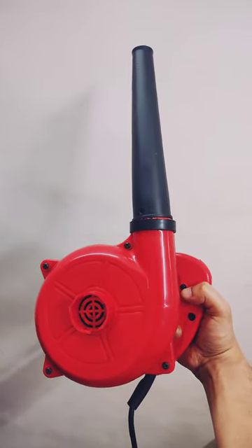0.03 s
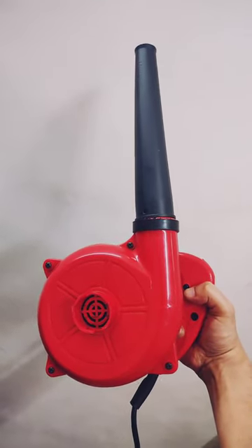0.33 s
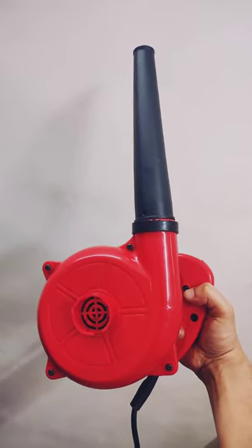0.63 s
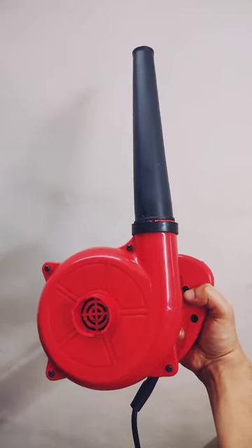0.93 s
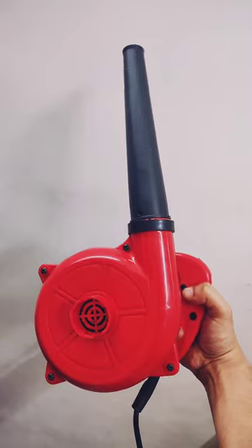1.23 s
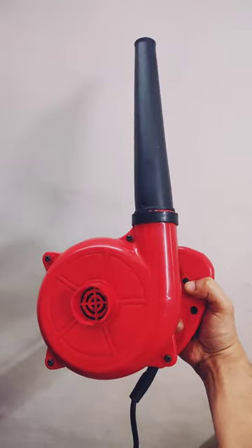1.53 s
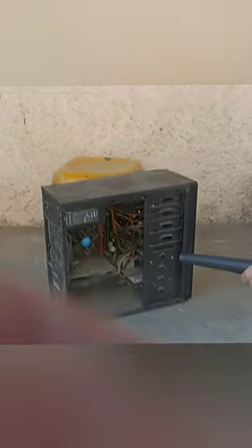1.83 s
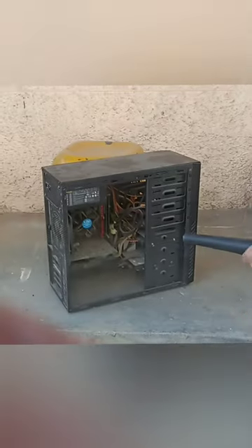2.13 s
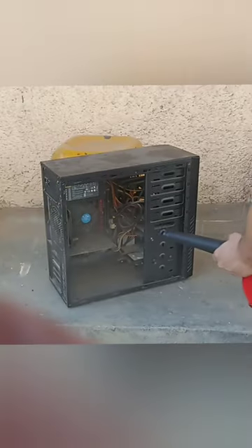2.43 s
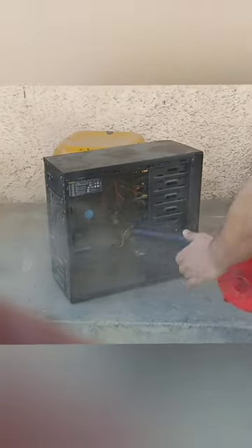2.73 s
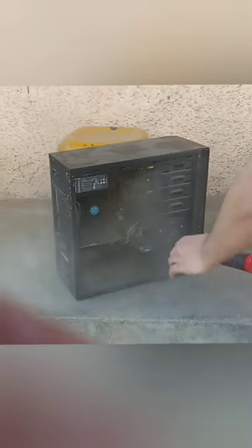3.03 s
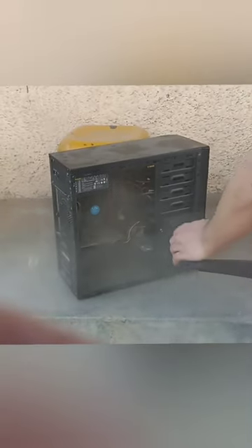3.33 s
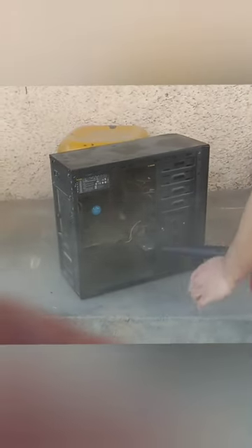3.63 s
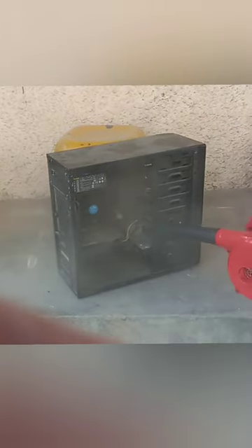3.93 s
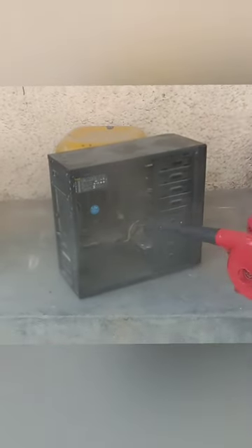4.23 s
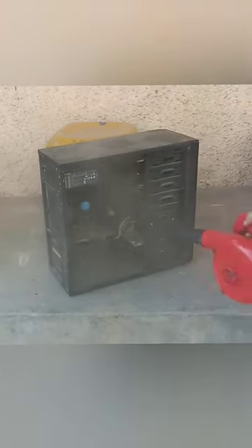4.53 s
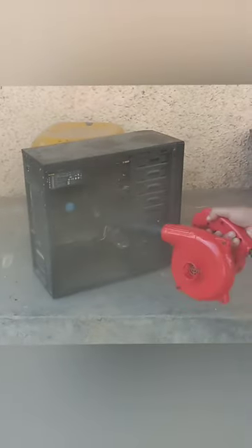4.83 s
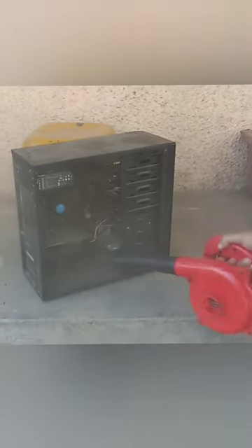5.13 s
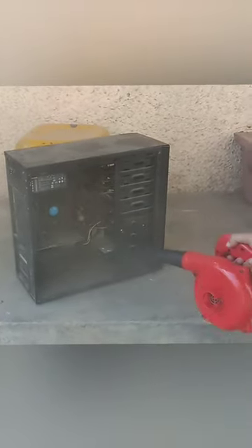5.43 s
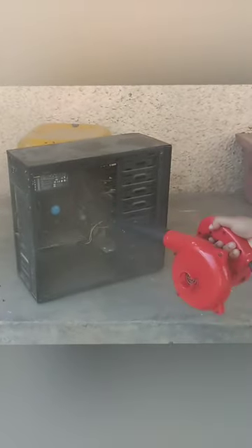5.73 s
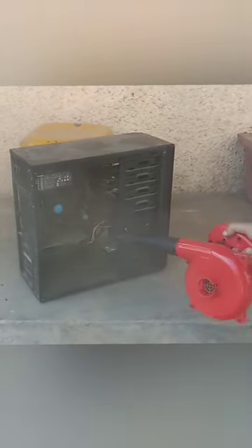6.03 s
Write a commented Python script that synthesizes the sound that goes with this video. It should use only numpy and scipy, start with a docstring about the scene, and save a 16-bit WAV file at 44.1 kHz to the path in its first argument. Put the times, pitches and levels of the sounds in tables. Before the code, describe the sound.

A hand-held electric blower whines and rushes at full speed close to the microphone, then is released and falls in pitch. After a split second of silence it is in a yard, off to the right. It spins up, coasts down and spins up again, its jet hissing and booming in a metal computer case. A finger on the microphone makes two short thumps.

```python
"""The whine and rush of a hand-held electric blower at full speed, close to the microphone; let go, it runs
down. After a brief silence it is out in a yard, off to the right, switched on twice more to blow the dust
out of a computer case. Impeller and commutator whine with the rotor's speed, the jet rushes and booms in
the case; a finger lies over the microphone and thumps as it shifts and lifts."""
import sys
import numpy as np
from scipy import signal
from scipy.fft import rfft, irfft, next_fast_len
from scipy.io import wavfile
from scipy.ndimage import uniform_filter1d

SR = 44100
rng = np.random.default_rng(int(sys.argv[2]) if len(sys.argv) > 2 else 0)


def unload_wav(signal):
    """Save mono or channel-first audio to the path in sys.argv[1] as 16-bit WAV at rate SR, clipped to [-1, 1]."""
    wavfile.write(
        sys.argv[1],
        SR,
        np.round(np.clip(np.atleast_2d(signal).T, -1, 1) * 32767).astype(np.int16),
    )


N = 272979
TIME = np.arange(N) / SR
FFT_SIZE = next_fast_len(N + SR // 10, True)
HZ = np.maximum(np.fft.rfftfreq(FFT_SIZE, 1 / SR), 1)


def from_db(db):
    return 10 ** (np.asarray(db) / 20)


def unit_rms(x):
    return x / np.sqrt(np.mean(x ** 2) + 1e-20)


def in_time(rows):
    """Each column of a curve, sample by sample."""
    times, *columns = np.transpose(rows)
    return np.array([np.interp(TIME, times, column) for column in columns])


def in_hz(rows):
    """Each column of a spectrum, interpolated in log frequency."""
    hz, *columns = np.transpose(rows)
    return np.array([np.interp(np.log(HZ), np.log(hz), column) for column in columns])


def ramp(start_s, length_s):
    """Rises from 0 to 1."""
    return np.clip((TIME - start_s) / length_s, 0, 1)


def colour(x, gain):
    """Filter by a gain for each frequency."""
    return irfft(rfft(x, FFT_SIZE) * gain, FFT_SIZE)[..., :N]


def drift(rate_hz):
    """A random wander of unit RMS, mostly slower than rate_hz."""
    return unit_rms(colour(rng.standard_normal(N), 1 / (1 + (HZ / rate_hz) ** 2)))


def resonance(hz, half_width_hz):
    """Gain of a resonance, 6 dB down about half_width_hz to either side."""
    return 1 / (1 + ((HZ / hz - hz / HZ) * hz / (2 * half_width_hz)) ** 2)


def lift_bands(x, bands):
    """Lift narrow bands of the flow noise so that they ring."""
    return colour(x, 1 + sum(from_db(db) * resonance(hz, half_width) for hz, half_width, db in bands))


def pan(x, right_db):
    """Place a sound between the microphone's two ports by a level difference."""
    return x * from_db(np.array([[-.5], [.5]]) * right_db)


def turbulence(gain, likeness, gust_db):
    """Stereo flow noise with a gain for each frequency; it swells and sinks with the eddies."""
    mid, side = rfft(rng.standard_normal((2, FFT_SIZE)))
    pair = np.sqrt(1 + likeness) * mid + np.sqrt(1 - likeness) * side * [[1], [-1]]
    flow = unit_rms(irfft(pair * gain, FFT_SIZE)[:, :N])
    return flow * from_db(gust_db * drift(rate_hz=18))


def rotor_tone(turns, order, rough, width_hz):
    """A multiple of the rotor speed, a rough share smeared around it; it wavers as the hand moves."""
    smear = (drift(width_hz) + 1j * drift(width_hz)) / np.sqrt(2)
    line = (np.sqrt(1 - rough) + np.sqrt(rough) * smear) * np.exp(2j * np.pi * order * turns)
    return unit_rms(np.real(line) * from_db(1.2 * drift(9.2)))


def rotor():
    """The rotor runs down and spins up twice; gives its speed and its slightly unsteady count of turns."""
    # rotor speed: time_s, turns_per_s
    speed_curve = [(0.0, 282.8), (0.6, 286.2), (1.1, 285.2), (1.2, 257.8), (1.33, 229.5), (1.5, 190.0),
                   (1.7, 158.8), (1.86, 139.2), (1.92, 117.8), (2.0, 110.2), (2.1, 100.8), (2.19, 92.5),
                   (2.225, 99.5), (2.26, 125.0), (2.3, 154.8), (2.38, 195.2), (2.5, 231.0), (2.65, 255.8),
                   (2.85, 269.8), (3.08, 276.8), (3.15, 272.2), (3.35, 223.0), (3.55, 185.0), (3.8, 148.2),
                   (3.93, 132.0), (4.055, 119.0), (4.12, 163.0), (4.2, 198.2), (4.3, 229.2), (4.5, 260.5),
                   (4.8, 274.8), (5.2, 279.5), (6.19, 282.0)]
    speed = in_time(speed_curve)[0]
    return speed, np.cumsum(speed * (1 + 0.00096 * drift(12))) / SR


def impeller(turns):
    """Ten blades pass on every turn and sound a tone."""
    # blade tone: time_s, level_db
    levels = [(0, -30), (.55, -36), (.75, -33), (1.25, -34), (1.6, -38), (1.85, -38), (1.95, -60),
              (2.4, -52), (2.52, -27), (2.72, -33), (2.85, -31), (2.95, -39), (3.08, -31), (3.2, -33),
              (3.3, -28), (3.42, -52), (4.2, -52), (4.35, -31), (4.52, -35), (4.68, -29), (4.9, -36),
              (5.45, -34), (5.7, -48), (6.15, -38)]
    return from_db(in_time(levels)[0]) * rotor_tone(turns, order=10, rough=.15, width_hz=8.3)


def near_air():
    """Roar and hiss of the air close to the microphone, with three narrow bands lifted; mono."""
    # air close by: time_s, roar_db, hiss_db
    levels = [(0, -20, -19), (.8, -20, -19), (1.3, -20, -20.5), (1.85, -26, -32)]
    # spectra of roar and hiss: frequency_hz, relative_db
    roar_spectrum = [(30, -46.5), (65, -29.5), (170, -11.5), (240, -10.5), (330, 1), (410, -5), (580, -2),
                     (800, -5.5), (1130, -3), (2000, -6), (2900, -22.5), (5000, -81.5)]
    hiss_spectrum = [(1400, -33.5), (2300, -2.5), (3450, -2.5), (4300, -5), (5500, -2), (7050, 1.5),
                     (7600, -5.5), (8000, -16.5), (8600, -53), (9500, -89)]
    # two resonances and the motor's steady 3.4 kHz whine: pitch_hz, half_width_hz, added_db
    narrow_bands = [(576, 14, -4.5), (1070, 27, -11), (3420, 21, 0)]
    roar_db, hiss_db = in_time(levels)
    roar = from_db(roar_db) * turbulence(from_db(in_hz(roar_spectrum)), likeness=1, gust_db=0)[0]
    hiss = from_db(hiss_db) * turbulence(from_db(in_hz(hiss_spectrum)), likeness=0.9, gust_db=-0.54)[0]
    return lift_bands(roar + hiss, narrow_bands)


def walls(x):
    """Early echoes off nearby walls ripple the spectrum."""
    # echoes: delay_s, level_db
    echoes = [(.0041, -21.5), (0.0112, -17.5), (.0236, -14)]
    return colour(x, 1 + sum(from_db(db) * np.exp(-2j * np.pi * HZ * delay) for delay, db in echoes))


def commutator(turns, sparking):
    """The brushes whine over 24 segments; the whine turns rough while they spark."""
    # brush noise: time_s, level_db
    levels = [(1.4, -48), (1.8, -41), (1.92, -48), (2.02, -38), (2.17, -38), (2.2, -44), (2.255, -33),
              (2.3, -47), (2.38, -57), (3.55, -58), (3.65, -49), (3.75, -54), (3.85, -41), (4.03, -38),
              (4.08, -36), (4.13, -58), (6.15, -45)]
    whine = rotor_tone(turns, order=24, rough=0.31, width_hz=47)
    sparks = rotor_tone(turns, order=24, rough=0.96, width_hz=100)
    return from_db(in_time(levels)[0]) * ((1 - sparking) * whine + sparking * sparks)


def armature(speed, turns):
    """Brushes and slots together; while the brushes spark, both throb at twice the mains frequency."""
    # spans in which the motor noise throbs and sparks: start_s, end_s
    spans = [(0, 1.11), (2.22, 3.9), (4.06, 6.19)]
    mains_hz = 50
    in_span = sum(1. * ((TIME > start) & (TIME < end)) for start, end in spans)
    sparking = uniform_filter1d(in_span, size=400)
    throb = 1 + 0.4 * sparking * np.cos(2 * np.pi * 2 * mains_hz * TIME)
    return throb * (commutator(turns, sparking) + slot_rasp(speed, turns))


def run_down_overtone(turns):
    """A thin overtone comes forward as the rotor runs down."""
    # overtone: time_s, level_db
    levels = [(1.4, -52), (1.62, -38), (1.86, -37)]
    return from_db(in_time(levels)[0]) * rotor_tone(turns, order=15.8, rough=0.37, width_hz=20)


def gusts():
    """Brief gusts swell and fade: a low puff of wind on the microphone, then the jet catching edges."""
    # gusts: peak_s, half_length_s, pitch_hz, width_hz, level_db
    bursts = [(1.558, 0.044, 190, 30, -28.5), (2.745, 0.13, 1530, 300, -28.5),
              (4.66, .04, 12000, 3000, -35), (4.88, 0.023, 2900, 700, -26), (4.987, 0.029, 990, 400, -24.5),
              (5, 0.044, 2680, 1200, -24), (5.01, 0.034, 10900, 3000, -35), (5.394, .17, 390, 83.5, -21.5),
              (5.4, 0.3, 840, 350, -25)]
    flow = rng.standard_normal(N)
    out = np.zeros(N)
    for peak_s, half_length_s, hz, width_hz, db in bursts:
        swell = from_db(db) * np.exp(-((TIME - peak_s) / half_length_s) ** 2)
        out += swell * unit_rms(colour(flow, resonance(hz, width_hz / 2)))
    return out


def yard_air():
    """Out in the yard the jet rushes over the case, drums its panels, rings its frame, sounds its cavity."""
    # strength of the jet: time_s, rush_relative_db, hiss_relative_db
    jet_levels = [(1.95, -47, -55), (2.2, -39.5, -49), (2.45, -28.5, -34), (2.78, -24, -27.5),
                  (3.15, -22.5, -28), (3.55, -33, -39.5), (4.03, -38, -48.5), (4.25, -28.5, -33.5),
                  (4.5, -23.5, -29), (5, -24, -27.5), (5.7, -23.5, -28.5), (6, -20.5, -27),
                  (6.19, -24, -28.5)]
    # the case in the jet: time_s, boom_db, panel_relative_db
    case_levels = [(1.95, -45.5, -44.5), (2.2, -42, -40), (2.5, -40, -31), (3.06, -36.5, -27),
                   (3.6, -36.5, -33.5), (4.07, -36.5, -37.5), (4.45, -39, -29), (5.15, -33, -30.5),
                   (5.9, -29, -29.5), (6.19, -36, -29.5)]
    # spectra of the rush and the panels' drone: frequency_hz, relative_db
    rush_spectrum = [(450, -28), (660, -4.5), (800, -2), (1090, 0.5), (1300, -2.5), (1550, -1), (2000, -2),
                     (2400, -1), (3000, -5), (4200, -16), (7000, -70)]
    panel_spectrum = [(130, -40), (185, -3), (230, -5.5), (280, -1), (310, -0.5), (380, 0.5), (460, -0.5),
                      (570, -1), (720, -25.5), (1300, -72)]
    # spectrum of the nozzle hiss: frequency_hz, left_db, right_db
    hiss_spectrum = [(2010, -49, -31), (2830, -47, -11.5), (3230, -12.5, -0.5), (3980, -17.5, -10),
                     (4760, -15.5, -15.5), (5830, -15, -12), (6700, -19, -13.5), (6700, -25, -14.5),
                     (7940, -21, -14), (9000, -21.5, -22), (11100, -17.5, -27), (11750, -13.5, -24.5),
                     (15500, -22.5, -24.5)]
    # likeness at the microphone's two ports: frequency_hz, correlation
    port_likeness = [(100, 0.96), (450, 0.96), (750, 0.81), (1400, 0.31), (3000, 0)]
    # metal frame resonances: pitch_hz, half_width_hz, added_db
    frame_modes = [(444, 26, -13.5), (1070, 60, -12), (2380, 59, -5), (6720, 120, -4.5)]
    rush_db, hiss_db = in_time(jet_levels)
    boom_db, panel_db = in_time(case_levels)
    likeness = in_hz(port_likeness)
    rush = from_db(rush_db - 0.5) * turbulence(from_db(in_hz(rush_spectrum)), likeness, gust_db=1.0)
    hiss = from_db(hiss_db + 5.5) * turbulence(from_db(in_hz(hiss_spectrum)), likeness, gust_db=1.07)
    panels = from_db(panel_db - 0.5) * turbulence(from_db(in_hz(panel_spectrum)), likeness, gust_db=1.2)
    boom = from_db(boom_db) * cavity(likeness)
    air = lift_bands(rush + panels + under_finger(hiss), frame_modes) + boom
    lag_s = np.array([[.00003], [0]])   # the blower stands to the right, so the left port hears it later
    return colour(air, np.exp(-2j * np.pi * HZ * lag_s))


def cavity(likeness):
    """The air in the case booms; its modes change strength as the nozzle moves in."""
    # hollow case: pitch_hz, half_width_hz, jet_outside_db, jet_inside_db
    modes = [(78, 14, -7.5, -24), (114, 37, -8.5, -4), (138, 16, -0.5, 3.5)]
    gains = sum(resonance(hz, half_width) * from_db([[outside_db], [inside_db]])
                for hz, half_width, outside_db, inside_db in modes)
    outside_gain, inside_gain = gains / (1 + (55 / HZ) ** 6)   # the port passes no deep bass
    inside = ramp(start_s=4.3, length_s=0.72)
    boom = np.sqrt(1 - inside) * turbulence(outside_gain, likeness, gust_db=0)
    boom += np.sqrt(inside) * turbulence(inside_gain, likeness, gust_db=0)
    # the steady jet sustains the boom at a nearly even strength
    power = uniform_filter1d(np.mean(boom ** 2, axis=0), size=SR // 20)
    return unit_rms(boom / np.maximum(power, 1e-6) ** .25)


def under_finger(x):
    """A finger over the microphone dulls the treble, mostly on the left, until it lifts."""
    # covered microphone: frequency_hz, left_db, right_db
    covered = [(1000, 0, 8), (2500, -22, 1.5), (4000, -0.5, -3.5), (5400, -7, -3), (6170, -11, 3),
               (7500, -10, -2.5), (10000, -15.5, -3), (13000, -15, -4), (15500, -11, -6)]
    lifted = ramp(start_s=4.24, length_s=0.032)
    return lifted * x + (1 - lifted) * colour(x, from_db(in_hz(covered)))


def slot_rasp(speed, turns):
    """The armature's slots sound a rough tone that breaks up into a broad rasp near full speed."""
    # slot noise: time_s, relative_db
    levels = [(2.24, -70), (2.33, -31.5), (2.42, -26.5), (2.56, -27), (2.8, -30.5), (3.1, -43), (4.05, -68),
              (4.13, -41), (4.22, -27), (4.32, -31.5), (4.46, -21), (4.65, -31), (5.1, -28), (5.55, -36.5),
              (5.92, -15), (6.15, -44)]
    slots = 12
    broken = (speed / speed.max()) ** 14
    tone = np.sqrt(1 - broken) * rotor_tone(turns, order=slots, rough=0.85, width_hz=66)
    rasp = np.sqrt(broken) * rotor_tone(turns, order=slots - .4, rough=1, width_hz=230)
    return from_db(in_time(levels)[0] - 3.5) * (tone + rasp)


def finger_thumps():
    """Each touch on the left port is a short, heavily damped swing of pressure, without deep bass."""
    # touches: start_s, level_db, pitch_hz, t60_s
    touches = [(3.3781, -0.5, 300, .012), (3.3812, 1.5, 510, 0.0058), (4.2249, -3.5, 187, 0.037),
               (4.2257, 3, 654, 0.0034)]
    pressure = np.zeros(N)
    for start_s, db, hz, t60_s in touches:
        age = np.maximum(TIME - start_s, 0)
        envelope = from_db(db - 60 * np.minimum(age / t60_s, 10))
        pressure -= envelope * np.sin(2 * np.pi * hz * age)
    low_cut = signal.butter(2, 110, "high", fs=SR, output="sos")
    return signal.sosfilt(low_cut, pressure) * from_db([[0], [-24]])


def scene():
    """The blower close up and centred, a brief silence, then the blower to the right in the yard."""
    speed, turns = rotor()
    blades = impeller(turns)
    overtone = run_down_overtone(turns)
    motor = armature(speed, turns)
    near = walls(near_air()) + blades + overtone + motor
    yard = walls(yard_air()) + pan(blades, right_db=9.5) + pan(motor, right_db=12.5)
    near *= 1 - ramp(start_s=1.86, length_s=0.0023)
    yard *= ramp(start_s=1.918, length_s=.045)
    return near + yard + gusts() + finger_thumps()


def record(dry):
    """The highest treble is cut steeply."""
    cutoff_hz, hz_per_db = 15850, 4
    return colour(dry, from_db(-np.clip((HZ - cutoff_hz) / hz_per_db, 0, 100)))


dry = scene()
out = record(dry)
unload_wav(out)
```